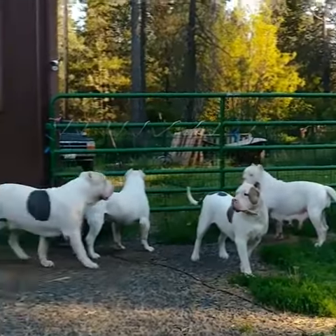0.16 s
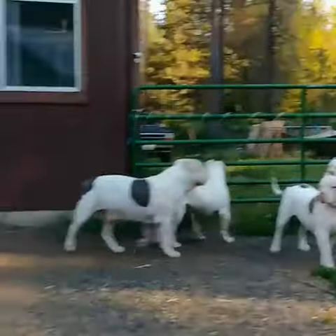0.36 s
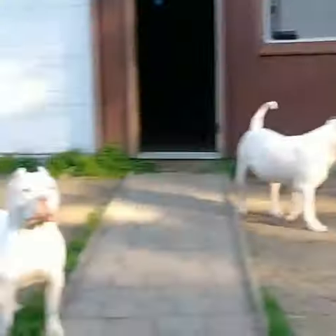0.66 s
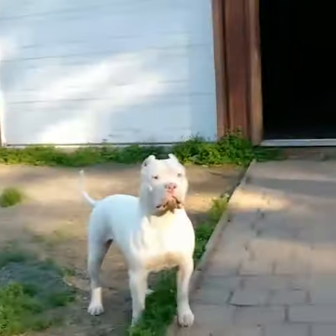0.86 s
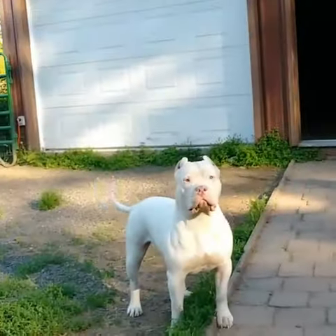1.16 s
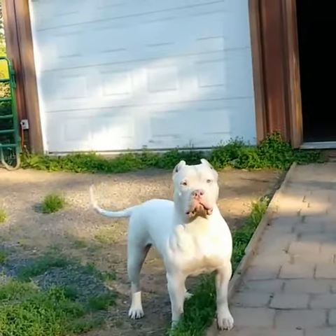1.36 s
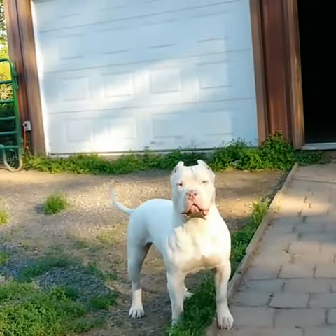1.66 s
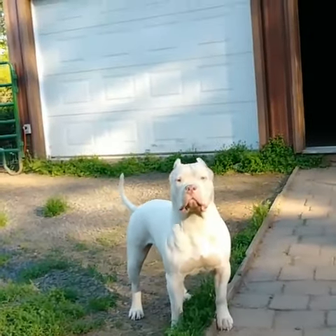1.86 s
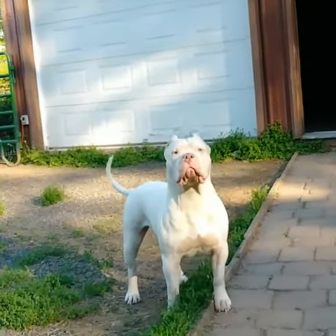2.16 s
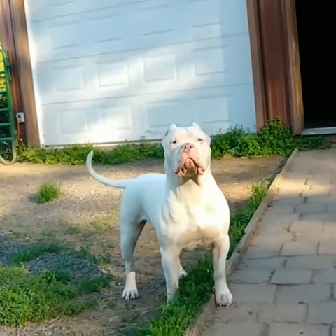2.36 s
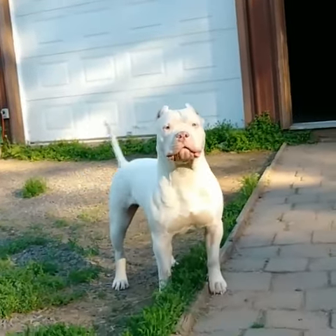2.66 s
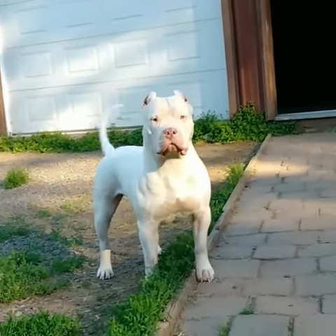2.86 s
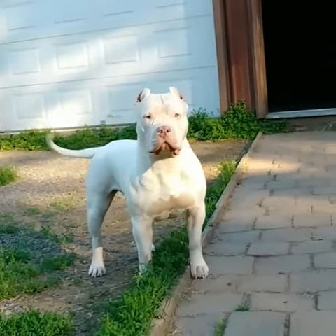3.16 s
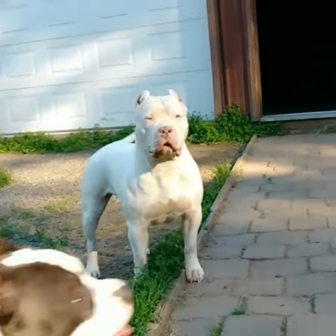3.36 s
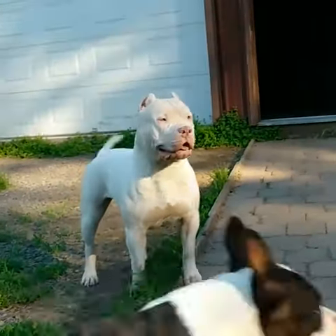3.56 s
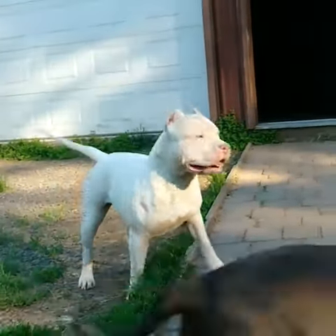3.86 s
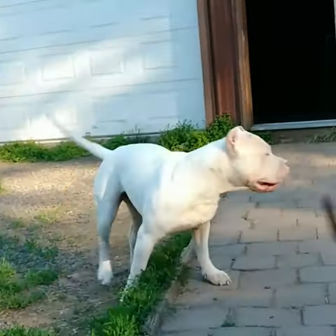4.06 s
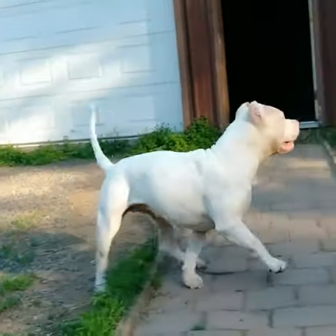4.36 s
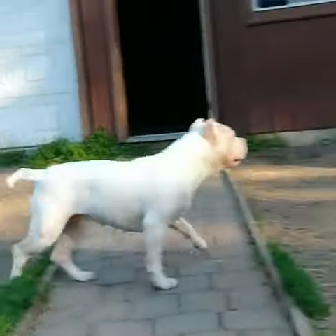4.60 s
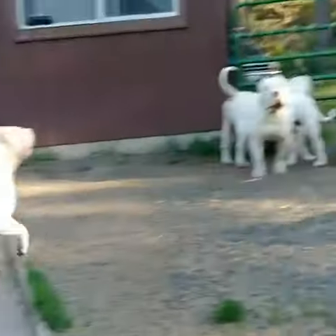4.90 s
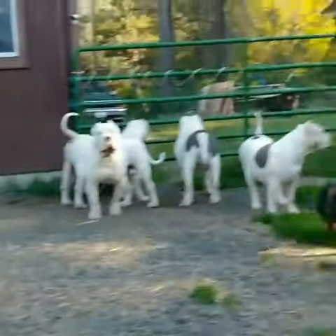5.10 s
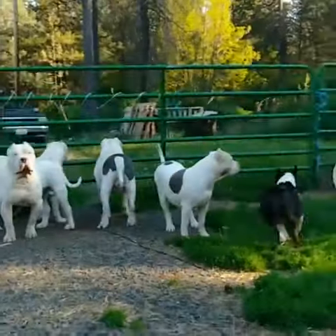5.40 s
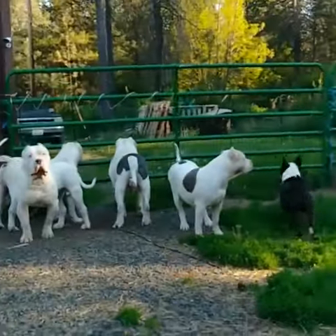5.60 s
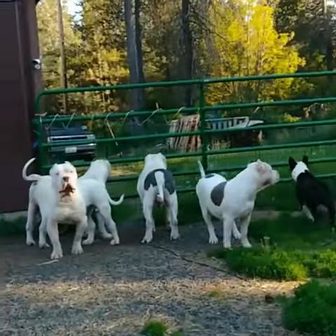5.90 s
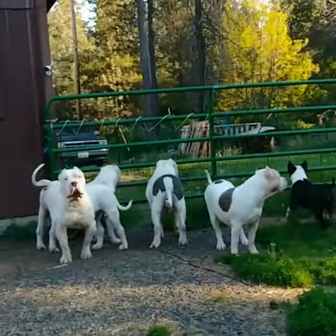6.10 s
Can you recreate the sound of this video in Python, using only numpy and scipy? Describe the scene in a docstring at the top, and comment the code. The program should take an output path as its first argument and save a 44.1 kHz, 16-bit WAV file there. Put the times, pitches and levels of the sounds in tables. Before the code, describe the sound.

A sharp loud bark, then gruff uneven woofs from large dogs outdoors, paws crunching on gravel, a dry snap, and near quiet.

```python
"""Dogs barking in a gravel yard

Big dogs huff and bark hoarsely between barn walls: chopped noise drives mouth and chest resonances.
Tones with noisy halos add clean notes, hoarse notes, nose whistles and far yelps. Shaped noise makes
paws in gravel, panting, knocked stones and air; decaying sines make one snap; a fuzzy tone hums low."""
import sys
import numpy as np
from scipy import signal
from scipy.fft import rfft, irfft
from scipy.io import wavfile
from scipy.ndimage import uniform_filter1d

SR = 44100
rng = np.random.default_rng(int(sys.argv[2]) if len(sys.argv) > 2 else 0)


def dump(signal):
    """Clip the signal to [-1, 1] and save it as 16-bit WAV at the path in sys.argv[1]."""
    limited = np.clip(np.atleast_2d(signal).T, -1, 1)
    pcm = np.round(limited * 32767).astype(np.int16)
    wavfile.write(sys.argv[1], SR, pcm)


N = 275184

# Barks and huffs. Each row: start, rise, hold, fall in seconds, effort in dB, swell over the hold in dB,
# chest thump in dB re effort, brightness in dB re effort, brightening over the hold in dB.
BARKS = [ (0.0, 0.0027, .04, 0.049, -59.5, -8, -12, -7.5, -4),
         (0.285, 0.022, 0.063, .08, -60, 4.5, -2.5, 5.5, -2.5),
         (0.538, .025, 0.061, 0.061, -18.5, -8, -24.5, -16, 16),
         (0.689, 0.039, 0.031, 0.13, -49, -3.5, -9, -2, 4),
         (1.064, .032, 0.085, 0.12, -38, -12.5, -16, -2, 1.5),
         (1.577, .015, .04, .02, -63, 6.5, -8, -1.5, 1), (1.625, 0.038, 0.033, .05, -26, -7, -4.5, -1, 2.5),
         (2.297, .03, .054, 0.092, -34, 1.5, -23, -9.5, 2),
         (2.48, .026, 0.15, 0.084, -51.5, -5, -3.5, -6, 10),
         (2.724, 0.044, .012, 0.089, -27, -3, -10.5, 3, -2.5),
         (2.84, 0.029, .1, 0.056, -51, 6.5, -9, -6.5, 7), (3.14, .02, 0.08, .03, -63, 11, -10.5, -13, 10),
         (3.269, .025, 0.079, .045, -44, 11.5, -39, 0, -7.5),
         (3.44, 0.054, 0.0067, .035, -55, -3.5, -3.5, -20, -5),
         (3.557, 0.061, 0.099, .03, -45.5, 0.5, -8, 0, -1.5),
         (3.716, .02, 0.083, .04, -39.5, 3.5, -17, -8.5, -1.5),
         (3.969, 0.039, 0.057, 0.053, -55, 7.5, -27, -3.5, 1.5),
         (4.128, 0.024, 0.079, 0.12, -40, 5.5, -11.5, -4, 1.5),
         (4.509, 0.041, 0.089, 0.15, -45.5, -8, -9, -10, 3.5),
         (4.784, 0.021, 0.11, 0.13, -49.5, 4, -8, -7, 5), (5.39, 0.039, 0.057, .11, -53.5, 2.5, -13, -1, 3),
         (5.969, 0.036, 0.052, .12, -57.5, 5.5, -11.5, 3.5, -4), ]
RISE_DB, FALL_DB = -29.5, -29  # ends of a bark, re the start and end of its hold
CHEST_LEAD_DB, CHEST_TRAIL_DB = 12, 8.5  # the chest sounds before and after the mouth
BRIGHT_LEAD_DB, BRIGHT_TRAIL_DB = 1, -3.5


def effort(start, rise, hold, fall, db, swell_db, chest_db, bright_db, brighten_db):
    """Rise, hold and fall of a bark as rows (s, effort dB, chest dB, brightness dB)."""
    rise_end = start + rise
    hold_end = rise_end + hold
    end_db, end_bright_db = db + swell_db, bright_db + brighten_db
    return [(start, db + RISE_DB, chest_db + CHEST_LEAD_DB, bright_db + BRIGHT_LEAD_DB),
            (rise_end, db, chest_db, bright_db),
            (hold_end, end_db, chest_db, end_bright_db),
            (hold_end + fall, end_db + FALL_DB, chest_db + CHEST_TRAIL_DB, end_bright_db + BRIGHT_TRAIL_DB)]


# Throat and mouth resonances, one list a bark, the last row being air hissing past the teeth.
# Each row: centre in Hz, width of the final pass in Hz, level in dB.
THROATS = [
    [(408, 134, 1), (870, 570, -10.5), (1940, 230, -9), (2590, 140, -7), (3500, 500, -24),
     (7000, 3600, -47)],
    [(930, 200, -3), (1770, 130, -4), (2238, 350, 1), (3540, 71, -16.5), (7000, 1600, -63)],
    [(454, 410, 1.5), (760, 220, -2), (1290, 270, 4), (1860, 350, -8.5), (2360, 300, -8.5),
     (3000, 100, -13.5), (3447, 400, -9), (4560, 620, -16.5), (6600, 2100, -34.5)],
    [(1030, 230, 0), (1860, 1070, -5.5), (2400, 240, 8), (3400, 370, 0), (7000, 2500, -31)],
    [(415.6, 210, -7), (880, 560, 11), (1501, 680, -10.5), (2406, 143, 2.5), (3150, 570, -13),
     (4150, 480, -10), (6970, 1700, -47.5)],
    [(950, 200, -3), (1400, 250, 0), (1920, 120, 2.5), (2350, 220, -2.5), (3400, 370, -13),
     (7000, 3000, -46)],
    [(400, 250, -8), (674, 310, 0), (1630, 244, 3.5), (2260, 1290, -4), (3300, 1400, -17), (4170, 200, 4),
     (4960, 520, 3), (6950, 2850, -21)],
    [(638, 340, 0), (2166, 320, -7), (3960, 320, -10), (4780, 320, -15.5), (5900, 810, -27),
     (6850, 1400, -32.5)],
    [(405, 140, -1), (1855, 260, -0.5), (2900, 94, -20), (3730, 340, -15), (4930, 180, -12.5),
     (7000, 1200, -35)],
    [(874, 800, -3), (1535, 430, 1.5), (2600, 880, -3), (3440, 670, -1.5), (4060, 310, 2),
     (4960, 410, -4.5), (7000, 2900, -27.5)],
    [(893, 370, 0), (2260, 560, -25), (2850, 610, -18.5), (3530, 340, -15.5), (4350, 620, -21.5),
     (7100, 1600, -39.5)],
    [(973, 110, 0), (2180, 480, -13), (2840, 330, -10.5), (3550, 430, -16), (4230, 1400, -13),
     (4950, 250, -3), (7000, 3800, -25.5)],
    [(960, 625, -4), (1303, 65, 10), (2160, 230, -5.5), (3120, 260, -3.5), (3700, 140, -7),
     (4270, 300, -11), (4840, 400, -11.5), (7300, 2550, -29.5)],
    [(1214, 100, 0), (2200, 430, -2), (3010, 570, -30), (3900, 500, -10), (5140, 360, -13),
     (5640, 390, -25), (7100, 3800, -34)],
    [(980, 280, 0), (2020, 350, -5), (3000, 1300, -22.5), (3790, 270, -15), (4950, 220, -19),
     (7030, 1000, -35)],
    [(553, 85, 4.5), (1022, 260, 9.5), (2480, 820, -6), (3640, 630, -10), (5000, 340, -30.5),
     (6800, 3300, -36)],
    [(1090, 135, 0), (2130, 100, 11.5), (3600, 420, -2.5), (4100, 266, -10), (7000, 2560, -34)],
    [(560, 168, -2.5), (1022, 395, -3.5), (1660, 300, -3), (2740, 730, -13.5), (4330, 260, -15),
     (6860, 1500, -43)],
    [(433, 160, -17.5), (1157, 250, 2.5), (2200, 62, -16), (3330, 290, -3), (5040, 210, -24),
     (7210, 3900, -38)],
    [(525, 160, -7), (1046, 410, -5.5), (2340, 170, 7.5), (3200, 480, 1), (3930, 440, -4),
     (7020, 4100, -38)],
    [(505, 55, -7), (1086, 270, 4), (2530, 510, 1), (3830, 110, -20.5), (5000, 280, -22), (5660, 230, -17),
     (6940, 2800, -43)],
    [(520, 75, -4.5), (1047, 47, -3.5), (1514, 210, -6.5), (2140, 150, 1), (2570, 78, 3.5),
     (3430, 170, -8.5), (6840, 2600, -46)],
]
FLAP_HZ, FLAP_STRAY = 170, .25  # mean rate of the folds, rms share by which it strays
WANDER = .015  # rms share by which each resonance strays, as the mouth never holds still
LUMP_DB = 2.2  # rms swell and fade of each resonance on its own


def bark(rows, throat):
    """Turbulent breath, chopped by loosely flapping folds, rings the chest, throat and mouth."""
    effort_db, chest_db, bright_db = played(rows)
    n = len(effort_db)
    turns = np.cumsum(FLAP_HZ * (1 + FLAP_STRAY * drift(n, size=300))) / SR
    flaps = np.diff(np.floor(turns), prepend=0) * amp(1.0 * drift(n, size=100))
    opening = .4 + np.exp(-(turns % 1) / .35)
    breath = opening * rng.standard_normal(n)
    drive = (evened(breath) + .35 * evened(flaps)) * amp(1.5 * drift(n, size=250))
    low, high = np.zeros(n), np.zeros(n)
    for hz, width_hz, db in throat:
        lumps_db = LUMP_DB * drift(n, size=220)
        moving_hz = hz * (1 + WANDER * drift(n, size=900))
        band = resonate(steep(drive, moving_hz, 2 * width_hz), moving_hz, width_hz)
        add(low if hz < 1500 else high, 0, amp(db + lumps_db) * band)
    chest = resonate(resonate(drive, 175, 240), 130, 230)
    voice = evened(low) + amp(chest_db) * evened(chest) + amp(bright_db) * evened(high)
    return amp(effort_db) * voice * signal.windows.tukey(n, .08)


def barks():
    """Every bark and huff, each through its own throat."""
    out = np.zeros(N)
    for row, throat in zip(BARKS, THROATS):
        add(out, row[0], bark(effort(*row), throat))
    return out


# Partials where the folds briefly ring clean.
# Each row: start, rise, fall in seconds, first pitch in Hz, last pitch in Hz, level in dB.
CLEAN_NOTES = [ (0.527, .046, .037, 298, 460, -23), (0.54, .018, .045, 1310, 1510, -28),
               (1.1, 0.027, 0.043, 401, 408, -47), (1.62, 0.016, .04, 178, 183, -37.5),
               (1.625, .03, .055, 720, 584.6, -32.5), (2.292, 0.051, .08, 662.8, 715, -32),
               (2.725, .014, .055, 138.1, 138.5, -30.5), (3.74, 0.058, 0.048, 495, 490, -39),
               (5.42, 0.041, 0.099, 498, 500, -50.5), ]


def clean_notes():
    """Folds ringing clean: gliding tones with little halo."""
    return notes(CLEAN_NOTES, edges_db=(-18.5, -11.5), width_hz=50, blur=0.43, flutter_db=2.0)


# Mouth resonances narrowing to a hoarse note.
# Each row: start, rise, fall in seconds, first pitch in Hz, last pitch in Hz, level in dB.
HOARSE_NOTES = [ (0.24, 0.022, .06, 250, 230, -60.5), (0.61, 0.014, .012, 1650, 2010, -30.5),
                (1.66, .024, 0.058, 1640, 1700, -40.5), (2.32, 0.0697, .042, 2123, 2300, -43),
                (2.55, 0.058, 0.045, 2050, 2054, -51), (2.751, 0.026, 0.063, 1600, 1800, -35),
                (2.86, 0.063, 0.087, 1005, 1015, -40), (3.28, 0.056, 0.048, 956, 987, -38),
                (3.565, 0.053, 0.049, 1700, 1860, -54), (3.57, 0.093, 0.03, 2157, 2340, -47),
                (3.58, 0.11, 0.028, 1017, 985, -45.5), (3.59, .05, .06, 600, 740, -53.5),
                (3.74, 0.076, 0.025, 946, 987, -41.5), (4.145, 0.018, 0.043, 550, 525, -44),
                (4.15, 0.099, 0.027, 1023, 1003, -42), (4.48, .1, .14, 255, 316, -56.5),
                (4.55, .04, 0.113, 620, 540, -57.5), (4.58, 0.056, 0.023, 2150, 2140, -60.5),
                (4.81, 0.043, 0.1, 1030, 1050, -48), (4.95, 0.057, .07, 520, 485, -57), ]


def hoarse_notes():
    """Narrowed mouth resonances: gliding tones with more halo than tone."""
    return notes(HOARSE_NOTES, edges_db=(-5, -8.5), width_hz=82, blur=1.5, flutter_db=2.4)


# Modes of the snap. Each row: frequency in Hz, level in dB, t60 in seconds.
SNAP_MODES = [(950, -2.5, 0.01), (1673, -1, 0.021), (2810, -5, 0.021), (3410, 5.5, 0.017), (4200, 3, 0.018),
              (4880, 1, 0.016), (7550, -3, 0.0044), (9540, -3.5, 0.003), (11800, -15.5, 0.0056)]
SNAP_S, SNAP_PEAK_DB = 5.044, -18  # start; peak of the cracks alone


def ring(modes):
    """Sum of decaying sines with a 0.34 ms attack."""
    t = np.arange(2000) / SR
    out = np.zeros(len(t))
    for k, (hz, db, t60_s) in enumerate(modes):
        out += amp(db - 60 * t / t60_s) * np.sin(2 * np.pi * hz * t + k * k)
    return out * np.minimum(t / 0.00034, 1)


def snap():
    """Three quick cracks of ringing modes over a decaying spray of grit."""
    t = np.arange(SR // 4) / SR
    cracks = np.zeros(len(t))
    for late_s, db in [(0, -2), (.0013, 12), (.0028, -2)]:
        add(cracks, late_s, amp(db) * ring(SNAP_MODES))
    spray = evened(steep(rng.standard_normal(len(t)), 3300, 1610))
    spray_fade = amp(-26.0 - 60 * t / 0.31)
    return amp(SNAP_PEAK_DB) * (cracks / abs(cracks).max() + spray_fade * spray)


LOUD_DB, GROWTH = -30, 2.2  # push grows faster than effort: little on a soft huff, much on a loud bark
HISS_DB, BLAST_DB = -31, -19.5  # thin hiss and wheezy blast on the barks, re push


def bark_push():
    """Gain curve of the air that each bark drives, from effort plus brightness."""
    push = np.zeros(N)
    for row in BARKS:
        effort_db, _, bright_db = played(effort(*row))
        add(push, row[0], amp(LOUD_DB + GROWTH * (effort_db + bright_db - LOUD_DB)))
    return push


# The pack milling about. Each row: time in seconds, paws in gravel in dB, panting in dB.
MILLING = [(0.0, -113, -93), (0.45, -108, -88), (0.75, -80, -65.5), (0.9, -68, -76), (1.05, -86.5, -87),
           (1.3, -94, -92), (1.8, -88, -81), (1.9, -79.5, -78), (2.0, -76, -84), (2.1, -78, -82),
           (2.22, -71.5, -67.5), (2.41, -67.5, -62), (2.68, -87, -61.5), (3.15, -75.5, -77.5),
           (3.4, -68, -67), (3.77, -69.5, -62.5), (4.05, -76.5, -67), (4.42, -78, -70), (4.47, -64.5, -56),
           (4.6, -71, -61), (4.66, -72, -69), (4.74, -59.5, -66), (4.85, -62, -59), (4.98, -84, -70.5),
           (5.15, -68, -63), (5.24, -90.5, -88), (5.3, -77.5, -88.5), (5.37, -94, -91.5), (5.6, -96, -92.5),
           (5.67, -79.5, -86.5), (5.76, -96.5, -88), (6.24, -100, -92)]
# Colour of the gravel. Each row: frequency in Hz, relative level in dB per Hz.
GRIT = [(3000, -25), (5000, -4), (6500, -5.5), (8500, -2.5), (11000, -13), (13000, -15)]
GRAINS_PER_S = 500


def milling_levels():
    """Paw and panting levels in dB at the sample rate."""
    s, *columns = np.transpose(MILLING)
    return [np.interp(np.arange(N) / SR, s, c) for c in columns]


def gravel(grit_db, push):
    """Noise with random strong grains crackles in scuffs; the same noise is the barks' thin hiss."""
    struck = rng.random(N) < GRAINS_PER_S / SR
    strength = amp(3.5 * np.minimum(rng.exponential(1, N), 5))
    grains = rng.standard_normal(N) * (.5 + strength * struck)
    crackle = patchy(coloured(grains, GRIT), 7.2, frames=6, bins=30)
    return (amp(grit_db) + amp(HISS_DB) * push) * crackle


# Colour of the breath. Each row: frequency in Hz, relative level in dB per Hz.
PANT = [(2000, -22), (2700, -5), (3400, 2), (4200, -1), (4800, 0), (5500, -8.5), (7000, -30.5)]


def panting(pant_db, push):
    """Breath noise in wheezy streaks, also the blast on every bark."""
    wheeze = patchy(coloured(rng.standard_normal(N), PANT), 5.0, frames=25, bins=2)
    return (amp(pant_db) + amp(BLAST_DB) * push) * wheeze


# Single stones knocked. Each row: start in seconds, peak in dB, band centre in Hz.
STONES = [(0.8405, -49, 5020), (0.8758, -42.5, 4690), (0.9167, -49, 4480), (0.9444, -53.5, 4510),
          (3.1091, -46.5, 4985), (3.8153, -36.5, 4250), (3.8394, -42, 4400), (3.8507, -50, 5210),
          (3.93, -42.5, 4300), (3.9472, -40, 4290), (4.0604, -49.5, 4300), (4.1077, -46.5, 4144),
          (4.4847, -39.5, 4970), (4.5294, -62, 4800), (4.6024, -39.5, 4980), (4.6274, -42, 4760),
          (4.6354, -44, 5190), (4.69, -51, 5230), (4.7454, -57, 4753), (4.7532, -36.5, 4820),
          (4.8042, -37.5, 4380), (4.9477, -50.5, 4300)]


def stones():
    """Each knock is a short decaying noise burst in one band."""
    out = np.zeros(N)
    t = np.arange(500) / SR
    for s, db, hz in STONES:
        burst = rng.standard_normal(len(t)) * amp(-60 * t / 0.031)
        knock = steep(burst, hz, 3260)
        add(out, s, amp(db) * knock / abs(knock).max())
    return out


# Breath whistling in a nose.
# Each row: start, rise, fall in seconds, first pitch in Hz, last pitch in Hz, level in dB.
WHISTLES = [ (0.543, 0.0093, 0.009, 3775, 4250, -40.5), (0.605, .022, 0.0051, 3400, 4500, -29.5),
            (1.185, 0.012, .14, 3600, 3330, -63), (1.885, 0.01, 0.026, 3505, 3470, -71),
            (1.93, 0.035, .14, 3790, 3950, -71), (2.13, .14, 0.031, 3640, 3360, -64),
            (2.14, 0.13, .04, 5000, 4730, -63.5), (2.16, 0.073, .09, 4300, 4300, -72),
            (2.47, 0.021, 0.11, 4750, 4880, -61.5), (2.55, 0.046, 0.056, 2930, 2800, -65),
            (4.34, 0.025, .04, 2880, 2850, -61), (6.8, .02, .04, 3800, 3650, -75),
            (6.11, 0.041, 0.11, 3846, 3480, -69), ]


def whistles():
    """Nose whistles: high gliding tones blurred by breath."""
    return notes(WHISTLES, edges_db=(-11, -10.5), width_hz=130, blur=.8, flutter_db=2)


# Partials of far yelps.
# Each row: start, rise, fall in seconds, first pitch in Hz, last pitch in Hz, level in dB.
YELPS = [ (0.185, .015, .04, 430, 490, -60.5), (0.88, 0.038, .08, 953, 800, -72),
         (0.918, 0.037, 0.08, 450, 455, -65), (1.58, 0.017, .02, 1914, 1915, -61),
         (1.8, .012, 0.13, 440, 440, -59), (1.875, .015, 0.042, 956, 994, -72.5),
         (1.89, 0.011, 0.05, 2080, 2040, -69), (1.893, 0.014, 0.094, 651, 676, -56),
         (1.95, 0.051, 0.1, 443, 416, -58), (1.984, 0.027, 0.063, 1150, 1205, -62),
         (1.985, 0.069, 0.029, 1975, 1862, -66), (1.986, 0.017, 0.1, 2345, 2440, -67.5),
         (1.987, 0.022, .05, 1450, 1430, -76), (2.02, 0.016, 0.044, 852, 870, -69.5),
         (2.2, 0.025, 0.035, 760, 775, -68.5), (2.56, 0.027, 0.073, 1330, 1276, -63.5),
         (5.55, .09, 0.077, 455, 410, -58.5), (5.69, .09, .19, 845, 944, -58.5),
         (5.795, .045, 0.1015, 443, 520, -52.5), (5.82, 0.068, 0.056, 621, 636, -62.5),
         (5.89, 0.026, .08, 500, 420, -60.5), (5.91, .03, .12, 670, 665, -57.5), ]


def yelps():
    """Far yelps, each partial a fuzzy gliding tone."""
    return notes(YELPS, edges_db=(-13.5, -15), width_hz=60, blur=.7, flutter_db=2.5)


# Swells of the low hum. Each row: start, rise, fall in seconds, level in dB.
DRONE = [(0.05, .2, .25, -66), (0.8, .2, .25, -66), (1.3, .3, .02, -60), (1.799, 0.39, .06, -64),
         (5.45, .18, 0.35, -61.5), (5.95, 0.31, .01, -60)]
DRONE_HZ, DRONE_EDGES_DB = 147.6, (-20.5, -13)


def drone():
    """A low hum of steady pitch that swells and drops away."""
    out = np.zeros(N)
    for start, rise, fall, db in DRONE:
        rows = glide(start, rise, fall, DRONE_HZ, DRONE_HZ, db, DRONE_EDGES_DB)
        add(out, start, partial(rows, 6.3, 0.58, 0))
    return out


# Colour of the air. Each row: frequency in Hz, relative level in dB per Hz.
AIR = [(15, -80.5), (25, -31), (153, -2), (246, -16.5), (281, -29), (686, -25.5), (1190, -37.5),
       (1470, -30), (2240, -38), (4550, -40), (5760, -42), (6750, -44), (13400, -54)]
AIR_DB = -66.5


def air():
    """Low rumble and faint hiss: coloured noise of gently wavering level."""
    level_db = AIR_DB + 0.76 * drift(N, size=3000)
    return amp(level_db) * evened(coloured(rng.standard_normal(N), AIR))


# Decay of the yard. Each row: frequency in Hz, t60 in seconds.
YARD = [(150, 0.15), (500, .35), (1500, 0.3), (4000, 0.19), (9000, 0.18)]
# Wall echoes. Each row: delay in seconds, level in dB.
WALLS = [(.011, -14), (0.021, -18), (.034, -21), (.085, -28.5)]


def yard(x):
    """Adds a few wall echoes and scattered taps that die band by band."""
    taps = np.zeros(SR // 2)
    at = np.arange(500, len(taps) - 20, 20)
    taps[at + rng.integers(0, 20, len(at))] = rng.choice([-1., 1.], len(at))
    hz, t, z = signal.stft(taps, SR, nperseg=256)
    fade = amp(-60 * t / read(YARD, hz)[:, None])
    tail = signal.istft(z * fade, SR, nperseg=256)[1]
    tail *= amp(-17) / np.linalg.norm(tail)
    for s, db in WALLS:
        add(tail, s, amp([db]))
    return x + signal.fftconvolve(x, tail)[:N]


def amp(db):
    """Amplitude of a level in dB."""
    return 10 ** (np.asarray(db) / 20)


def evened(x):
    """Scales to rms 1."""
    return x / np.sqrt(np.mean(x ** 2) + 1e-20)


def read(points, hz):
    """Interpolates a table over log frequency."""
    f, value = np.transpose(points)
    return np.interp(np.log(hz + 1), np.log(f + 1), value)


def add(mix, s, sound):
    """Mixes in a sound at s seconds, cut at the end of the mix."""
    part = mix[round(s * SR):][:len(sound)]
    part += sound[:len(part)]


def played(rows):
    """Columns of a table as curves at the sample rate."""
    s, *columns = np.transpose(rows)
    t = np.arange(s[0], s[-1], 1 / SR)
    return [np.interp(t, s, c) for c in columns]


def resonate(x, hz, width_hz):
    """Shifts the curve hz down to zero, smooths, and shifts back: a resonance of gain 1."""
    turn = np.exp(2j * np.pi * np.cumsum(hz * np.ones(len(x))) / SR)
    r = np.exp(-np.pi * width_hz / SR)
    return 2 * (turn * signal.lfilter([1 - r], [1, -r], x / turn + 1e-18)).real


def steep(x, hz, width_hz):
    """Three passes of one resonance, each twice width_hz wide: a band with dark valleys beside it."""
    for _ in range(3):
        x = resonate(x, hz, 2 * width_hz)
    return x


def coloured(x, points):
    """Filters by a table of (Hz, dB)."""
    return irfft(rfft(x) * amp(read(points, np.fft.rfftfreq(len(x), 1 / SR))), len(x))


def drift(count, size):
    """Random wander of rms 1, smoothed twice over size samples."""
    return evened(uniform_filter1d(uniform_filter1d(rng.standard_normal(count), size), size))


def patchy(x, depth_db, frames, bins):
    """Random patches of louder and quieter sound over time and frequency, evened to rms 1."""
    z = signal.stft(x, nperseg=256)[2]
    patches = uniform_filter1d(uniform_filter1d(rng.standard_normal(z.shape), bins, 0), frames, 1)
    return evened(signal.istft(z * amp(depth_db * evened(patches)), nperseg=256)[1][:N])


ROUND = 0.32  # share of a note's edge drop that is left halfway along the slope


def glide(start, rise, fall, first_hz, last_hz, db, edges_db):
    """A note that swells, fades and slides evenly in pitch, as rows (s, Hz, dB)."""
    s = np.array([0, rise / 2, rise, rise + fall / 2, rise + fall])
    drop_db = np.array([edges_db[0], ROUND * edges_db[0], 0, ROUND * edges_db[1], edges_db[1]])
    return np.transpose([start + s, first_hz + (last_hz - first_hz) * s / s[-1], db + drop_db])


def partial(rows, width_hz, blur, flutter_db):
    """One partial: a tone with a fuzzy halo, its level fluttering."""
    hz, db = played(rows)
    halo = steep(rng.standard_normal(len(hz)), hz, width_hz)
    tone = np.sqrt(2) * np.sin(2 * np.pi * np.cumsum(hz) / SR)
    broken = (tone + blur * evened(halo)) * amp(flutter_db * drift(len(hz), size=250))
    return amp(db) * evened(broken) * signal.windows.tukey(len(hz), .2)


def notes(table, edges_db, width_hz, blur, flutter_db):
    """Every gliding partial of a table; edges_db are its drops at start and end."""
    out = np.zeros(N)
    for row in table:
        add(out, row[0], partial(glide(*row, edges_db), width_hz, blur, flutter_db))
    return out


# Microphone response. Each row: frequency in Hz, gain in dB.
MICROPHONE = [(30, -26.5), (110, -13.5), (200, -1), (5000, 0), (6500, 0.5), (12000, -9)]


def scene():
    """Dogs, snap and ground in the yard through the microphone, plus air and drone, on two channels."""
    grit_db, pant_db = milling_levels()
    push = bark_push()
    near = barks() + clean_notes() + hoarse_notes()
    near += gravel(grit_db, push) + panting(pant_db, push) + stones()
    near += whistles() + yelps()
    add(near, SNAP_S, snap())
    return np.tile(coloured(yard(near), MICROPHONE) + air() + drone(), (2, 1))


# Treble that differs between the channels. Each row: frequency in Hz, gain in dB.
PORTS = [(4000, -70.5), (4700, -19.5), (6000, -10), (8000, -9.5), (12000, -11.5)]
EDGE_HZ = 13300  # low-pass cutoff


def record(dry):
    """Treble scattered by the housing, now more, now less, splits the channels; then the band limit."""
    scatter = rng.standard_normal(SR // 40)
    scattered = signal.oaconvolve(dry[0], scatter / np.linalg.norm(scatter), "same")
    side = coloured(scattered, PORTS) * amp(5.0 * drift(N, size=1500))
    wide = dry + side * np.array([[1], [-1]])
    low_pass = signal.firwin(511, EDGE_HZ, window=("kaiser", 9), fs=SR)
    return signal.oaconvolve(wide, low_pass[None], "same")


dry = scene()
out = record(dry)
dump(out)
```